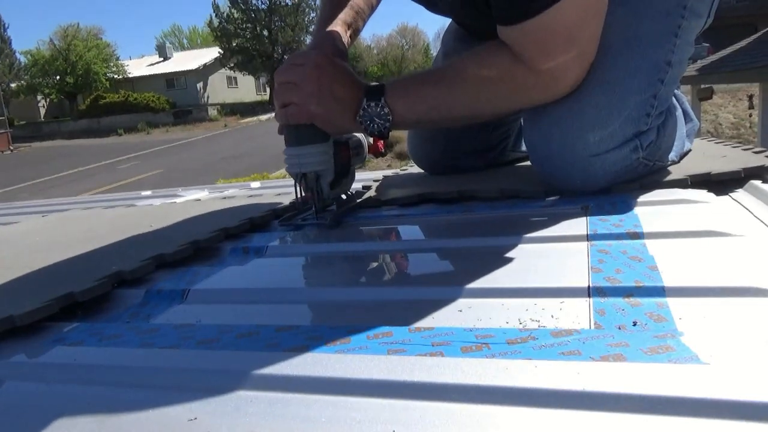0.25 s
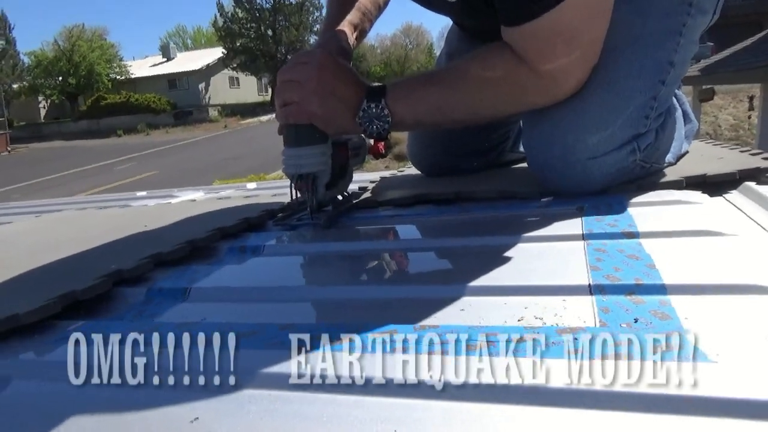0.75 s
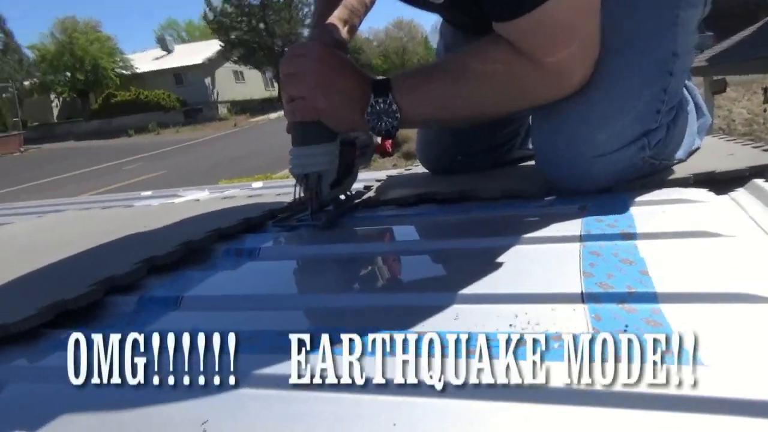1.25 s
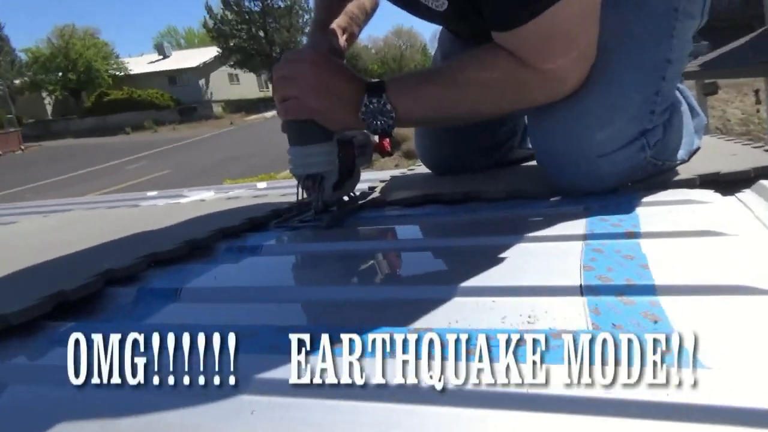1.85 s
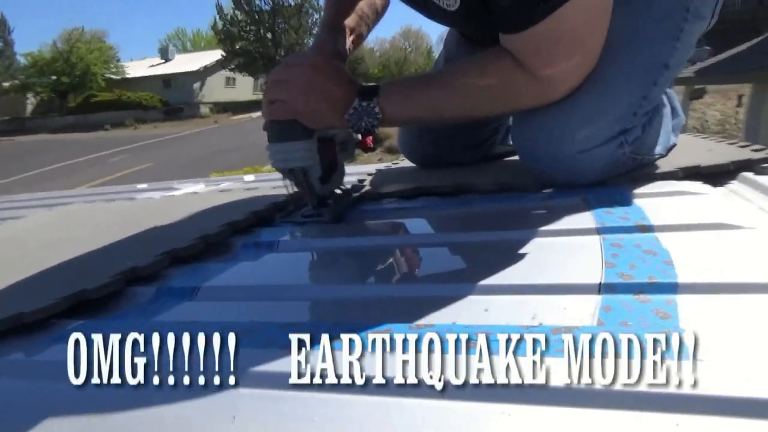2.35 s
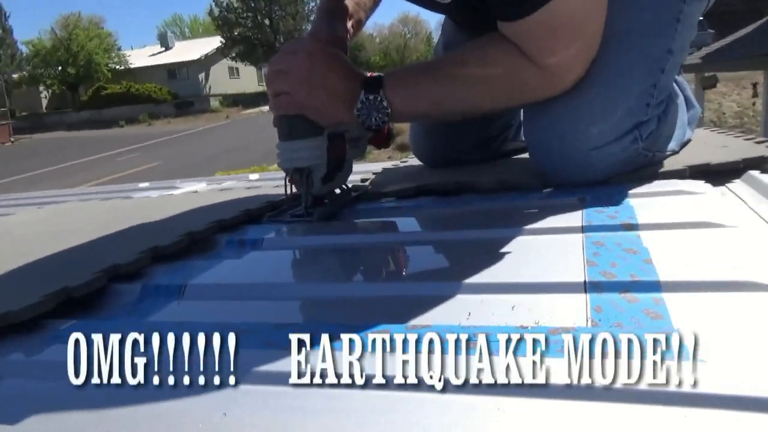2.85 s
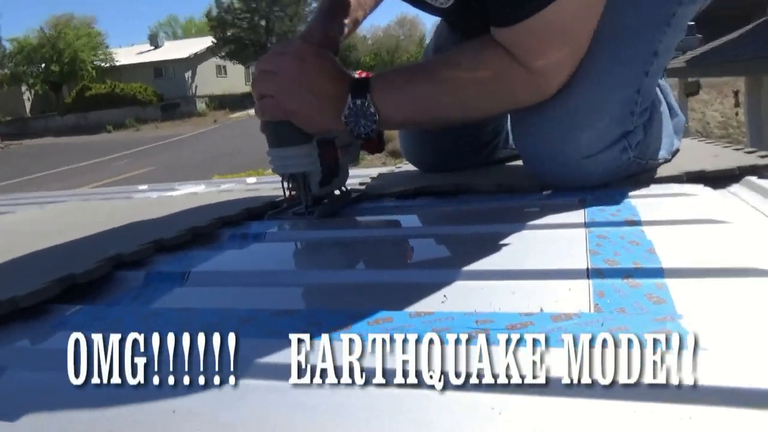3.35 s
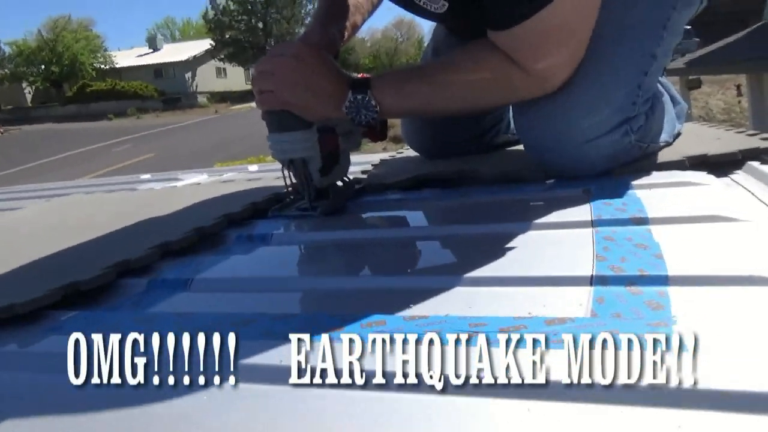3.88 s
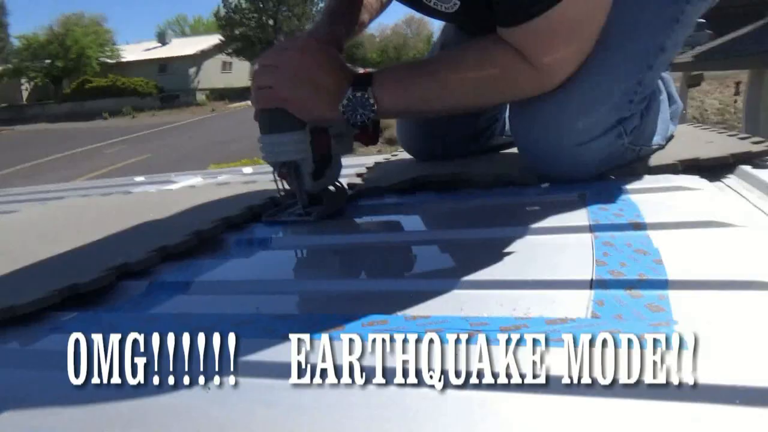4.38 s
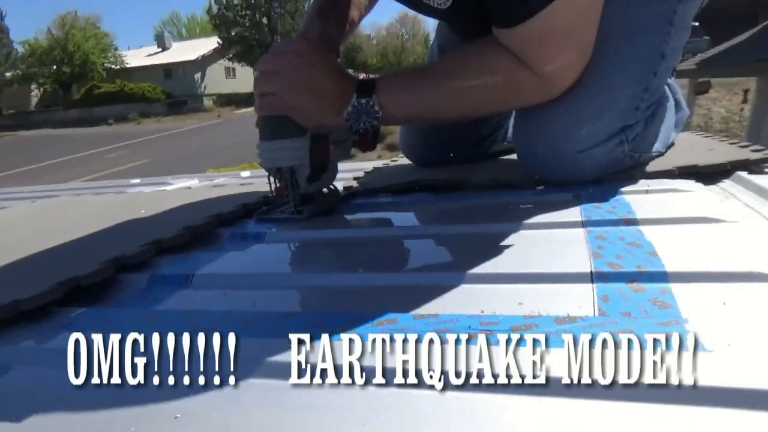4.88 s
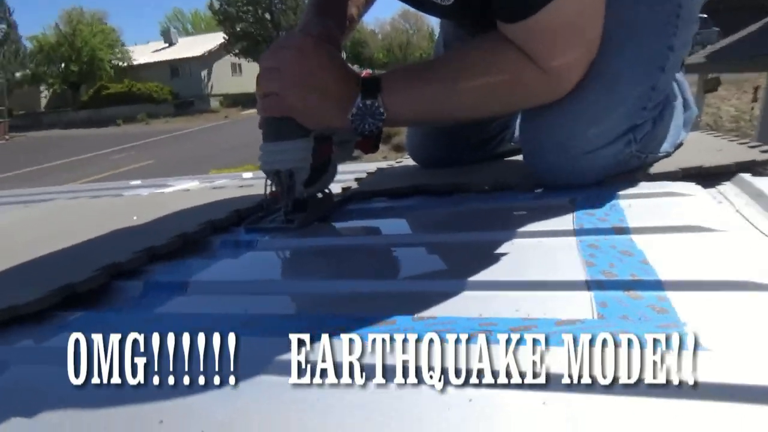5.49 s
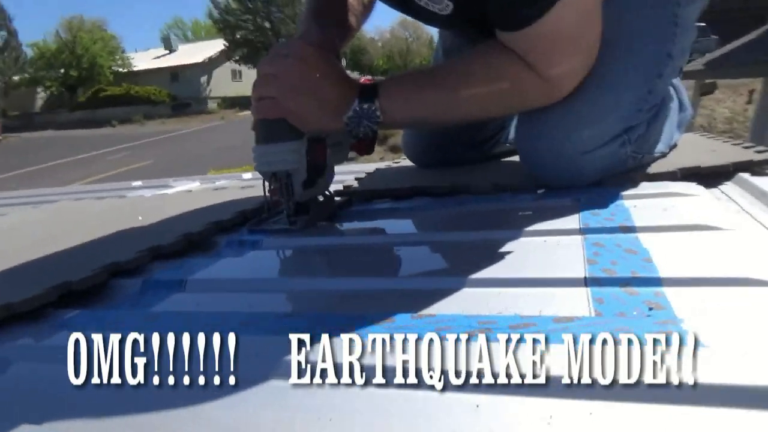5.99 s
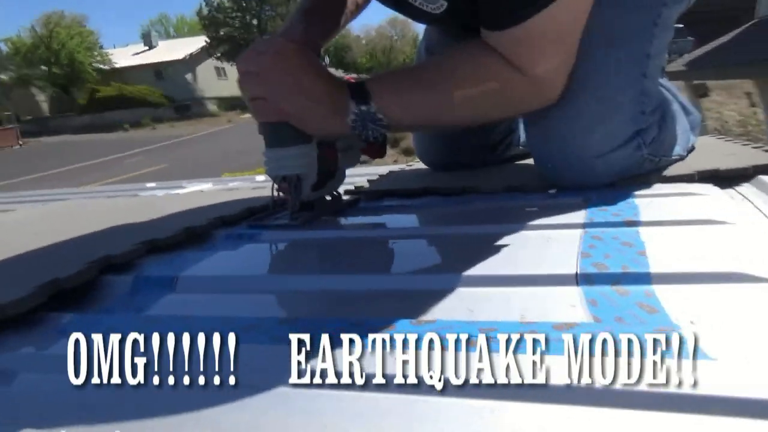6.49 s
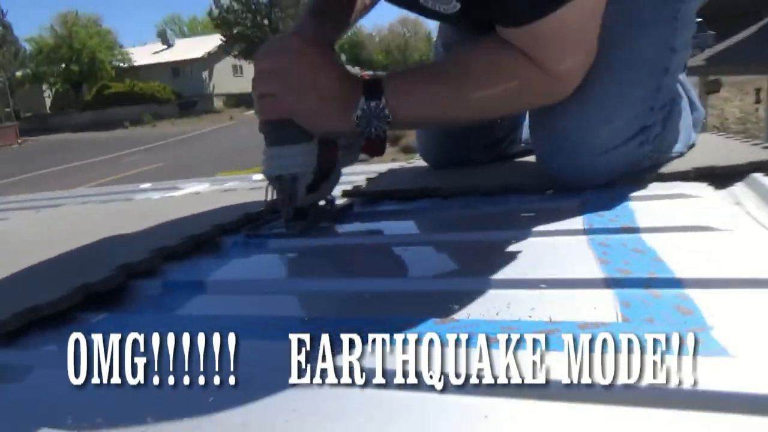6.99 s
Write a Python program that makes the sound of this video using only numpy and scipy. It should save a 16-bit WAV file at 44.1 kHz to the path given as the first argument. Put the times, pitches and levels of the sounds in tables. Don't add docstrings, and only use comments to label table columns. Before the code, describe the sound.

Switch clicks precede short bursts of jigsaw clatter on ringing sheet metal, about thirty-nine strokes per second once at speed. A longer cut grows regular and tonal, then is released and falls silent for a moment. The saw restarts and continues to the end, chattering loosely at a snag and turning boomier later. Outdoors, heard about a metre away through the roof, with faint distant traffic.

```python
import sys
import numpy as np
from scipy import signal
from scipy.fft import rfft, irfft
from scipy.io import wavfile
from scipy.ndimage import uniform_filter1d, map_coordinates

SR = 44100
rng = np.random.default_rng(int(sys.argv[2]) if len(sys.argv) > 2 else 0)


def pcm_store(signal):
    levels = np.round(np.clip(np.atleast_2d(signal), -1, 1) * 32767)
    wavfile.write(sys.argv[1], SR, levels.astype(np.int16).T)


def voltage_ratio(decibels):
    exponent = np.asarray(decibels, float) / 20
    return 10 ** exponent


N = 319010
TIME = np.arange(N) / SR
STEPS_PER_STROKE = 1152
RESTART_S = 3.19
BAND_EDGES_HZ = (600, 2000, 5500)


def unit(x):
    return x / np.sqrt(np.mean(x ** 2))


def read(points, hz):
    point_hz, point_db = np.array(points)[:, 0], np.array(points)[:, 1]
    return np.interp(np.log(np.maximum(hz, 1)), np.log(np.maximum(point_hz, 1)), point_db)


def tint(x, points):
    count = x.shape[-1]
    return irfft(rfft(x) * voltage_ratio(read(points, np.fft.rfftfreq(count, 1 / SR))), count)


def ring(x, hz, width_hz):
    return signal.lfilter(*signal.iirpeak(hz, hz / width_hz, SR), x) * np.sqrt(SR / (np.pi * width_hz))


def walk(rate_hz):
    hold = int(SR / rate_hz)
    return 0.97 * uniform_filter1d(np.repeat(rng.standard_normal(N // hold + 1), hold), hold)[:N]


def tail(t60_s, count):
    t = np.arange(int(SR * 1.2)) / SR
    h = rng.standard_normal((count, len(t))) * np.exp(-np.log(1000) * t / t60_s)
    return h / np.sqrt(np.sum(h ** 2, axis=-1, keepdims=True))


def quiet_street():
    # frequency in Hz, level in dB per Hz.
    street_colour = [(21, -73), (35, -25), (361, -18), (431, -22), (569, -18), (995, -16), (1160, -19.5),
                     (1650, -19.5), (15000, -51.5)]
    # time in seconds, level in dB.
    street_db = [(0, -40), (.3, -41.5), (.7, -44), (3.0, -55.5), (7.23, -55)]
    noise = rng.standard_normal((3, N))
    level = voltage_ratio(np.interp(TIME, *np.transpose(street_db)))
    return level * unit(tint(noise[0] + 0.39 * noise[1:], street_colour))


def trigger():
    # time in seconds, peak level in dB.
    clicks = [
        (0.0202, -11.5),
        (0.3432, -14),
        (0.618, -18.5),
        (3.171, -33),
    ]
    # frequency in Hz, width in Hz, level in dB.
    switch_modes = [(3600, 1000, -3), (4500, 270, -3), (8300, 1500, -7), (9400, 830, 0), (6700, 800, -9)]
    kicks = np.zeros(N)
    for s, db in clicks:
        i = int(s * SR)
        kicks[i:i + 90] = voltage_ratio(db - 11.0) * rng.standard_normal(90) * np.hanning(90)
    return sum(voltage_ratio(db) * ring(kicks, hz, width) for hz, width, db in switch_modes)


def motor():
    # time in seconds, strokes per second.
    speed = [(0, 30), (.65, 30), (.8, 35), (1.08, 38.75), (1.35, 38.7), (1.5, 39.3), (1.75, 38.7),
             (2.05, 38.65), (2.4, 39.25), (2.75, 38.95), (3.6, 38.5), (3.85, 39.05), (4.9, 38.9),
             (5.45, 39.15), (6.3, 39.35), (6.6, 38.7), (7.23, 38.6)]
    # middle in seconds, length in seconds, strokes per second lost.
    snags = [
        (4.38, .5, 3.8),
        (4.7, .12, .6),
        (5.15, .3, .65),
        (5.65, .3, .55),
        (6.0, .2, .6),
        (7.07, .55, 3.0),
    ]
    let_go_s, full_rate, coast_per_s, crawl_rate, spin_up_per_s = 2.745, 39, 90, 17, 150
    lost_rate = 0
    for s, length, lost in snags:
        lost_rate = lost_rate + lost * np.cos(np.pi * np.clip((TIME - s) / length, -.5, .5)) ** 2
    coast = np.maximum(full_rate - coast_per_s * (TIME - let_go_s), crawl_rate)
    limit = np.maximum(coast, crawl_rate + spin_up_per_s * (TIME - RESTART_S))
    slack = np.clip((full_rate - limit) / (full_rate - crawl_rate), 0, 1)
    return np.minimum(np.interp(TIME, *np.transpose(speed)) - lost_rate, limit), lost_rate, slack


def pulls(shares):
    # motor starts, teeth meet the sheet, sound begins to fall, silent, all in seconds.
    trigger_pulls = [
        (.035, .047, .157, .215),
        (.36, .373, .503, .527),
        (.634, .651, 2.95, 2.985),
        (3.192, 3.228, 7.5, 7.6),
    ]
    # time in seconds, push along the cut in dB, looseness of the shoe in dB.
    feed = [(.1, 0.5, 1), (.7, 0, -1.5), (1.05, 1, 0), (1.3, 0.5, 5), (1.5, 0.5, 4), (2.05, 0.04, -4.5),
            (2.6, 0.4, -0.5), (2.85, -1.5, 4), (3.55, -1, 1.5), (4.1, -1, 0), (4.3, 1.5, 12.5),
            (4.5, -2, 9.5), (4.75, 0, 10), (5.15, -0.5, 6), (5.41, -2, 1), (6.15, 0, 2), (6.7, 2.5, -2.5),
            (7.23, 3.5, 1.5)]
    place_db = [
        (-32.5, -20, -19.5, -19.5),
        (-44.5, -18, -22, -22.5),
        (-30, -18, -23.5, -21.5),
    ]
    push_share = (0.96, 0.82, 1.3, 1.45)
    loose_share = (1, 0.12, 0.24, -0.078)
    # level in dB while the blade runs free, level in dB reached as the sound falls to silence.
    free_db = (-2, -15.5, -7.5, -2)
    end_fall_db = (-6, -5.5, -21.5, -26)
    start_db, rise_s, meet_s = -31, 0.0057, 0.0023
    s, push, loose = np.transpose(feed)
    db = np.transpose(place_db) @ np.array(shares)
    db = db + np.outer(push_share, np.interp(TIME, s, push))
    db = db + np.outer(loose_share, np.interp(TIME, s, loose))
    gate = np.zeros((4, N))
    for start, meet, fall_start, silent in trigger_pulls:
        on = (TIME >= start) & (TIME < silent)
        times = np.maximum.accumulate([start, start + rise_s, meet, meet + meet_s, fall_start, silent])
        for band, (free, fall) in enumerate(zip(free_db, end_fall_db)):
            gate[band, on] = voltage_ratio(np.interp(TIME[on], times, [start_db, free, free, 0, 0, fall]))
    return uniform_filter1d(gate * voltage_ratio(db), 88, axis=1)


def strokes(turns, likeness, grain_db=1.0):
    shape = (300, STEPS_PER_STROKE)
    rows = rng.standard_normal(shape) * voltage_ratio(grain_db * np.minimum(rng.exponential(size=shape), 3))
    keep = np.clip(np.interp(np.arange(300), turns, likeness), 0, .99)
    for k in range(1, 300):
        rows[k] = keep[k] * rows[k - 1] + np.sqrt(1 - keep[k] ** 2) * rows[k]
    return unit(rows.ravel())


def bite(turns, depth, force, fall=0.21, back_db=-7.5, back_turn=0.41):
    pulse = 0
    for k, (late, db) in enumerate([(0, 0), (back_turn, back_db)]):
        p = turns + 4 - late
        pulse = pulse + voltage_ratio(db) * force[p.astype(int), k] * np.exp(-(p % 1) / fall)
    pulse = uniform_filter1d(pulse, size=200)
    return unit(1 + np.clip(depth, 0, .95) * (pulse / pulse.mean() - 1))


def shake(turns, likeness, boom, running):
    # multiple of the stroke rate, level in dB.
    orders = [(1, -34), (2, -31), (3, -15), (4, -14.5), (5, -14), (6, -8), (7, -19), (8, -6.5), (9, 1.5),
              (10, -1), (11, -4), (12, -21)]
    out = 0
    for k, db in orders:
        phase = 2 * np.pi * (k * turns + rng.random()) + 0.91 * walk(4.3)
        line = voltage_ratio(db + 2 * walk(3.51)) * np.sin(phase)
        out = out + line * (voltage_ratio(-40.0) * running if k < 6 else voltage_ratio(-3.0) * boom)
    return out * np.sqrt(likeness)


def teeth(turns, caught, likeness, slack):
    # teeth passing per stroke, level in dB.
    tooth_orders = [(42, 0), (34, -3)]
    late_turns, sweep_turns, slip_hz = 0.24, .16, 23
    slow_db = (0, -11.5)
    angle, out = 2 * np.pi * (caught - late_turns), 0
    for (order, db), fade_db in zip(tooth_orders, slow_db):
        slip = np.cumsum((1 - likeness) * walk(35.0)) * slip_hz / SR
        tone = np.sin(2 * np.pi * (order * turns - sweep_turns * np.cos(angle) + slip))
        out = out + tone * voltage_ratio(db + fade_db * slack + 0.57 * walk(24.84))
    return unit(out * (1 + 0.49 * np.cos(angle)))


def singing(knocks, caught, force, running):
    # start in seconds, length in seconds, frequency in Hz, width
    # in Hz, level in dB.
    resonances = [(0.42, 0.12, 1450, 110, -21.5), (0.69, 0.14, 1445, 29, -24),
                  (0.923, 0.09, 1450, 50, -25), (2.82, 0.11, 2010, 87, -22.5),
                  (3.228, 0.012, 2050, 230, -11.5), (3.57, .62, 5090, 140, -26),
                  (1.27, 1.43, 2660, 170, -26), (0.97, 0.47, 1760, 100, -31),
                  (3.26, 0.93, 3050, 42, -30.5), (4.67, 1.1, 4230, 110, -31), (5.8, 0.65, 3620, 130, -41),
                  (6.24, 0.83, 1590, 280, -29), (4.22, 1.16, 2680, 140, -27.5), (4.1, 2.55, 1924, 79, -28),
                  (6.8, 0.67, 3700, 250, -32), (2.94, 0.19, 1100, 50, -50), (0.469, .055, 350, 79, -26.5),
                  (1.91, 0.98, 935, 76, -34), (4.055, 0.65, 928, 20, -31), (3.23, 0.56, 1370, 250, -24.5),
                  (2.94, 0.051, 806, 150, -28), (2.39, 0.6, 430, 30, -49), (3.12, 1.11, 346, 84, -43),
                  (4.0, 0.92, 620, 120, -44.5),
                  (.65, 2.1, 8300, 350, -35), (.65, 2.0, 12400, 300, -33.5), (3.3, 2.5, 6640, 250, -37),
                   (5.5, 2.2, 13500, 700, -34), (6.4, 1.4, 9000, 500, -36), (4.195, .3, 2900, 1000, -24)]
    blow = unit(np.diff(np.floor(caught), prepend=0).clip(0))
    struck = unit(blow + 0.84 * knocks)
    out = 0
    for s, length, hz, width, db in resonances:
        swell = np.sqrt(np.sin(np.pi * np.clip((TIME - s) / length, 0, 1)).clip(0))
        pulse = bite(caught + 0.024, 0.36 * running, force, fall=0.24, back_db=-15.0)
        source = struck if hz < BAND_EDGES_HZ[-1] else knocks
        out = out + voltage_ratio(db) * ring(source * swell * pulse, hz, width)
    return out


def panel(knocks, rasp, gains, modes, colour, over_db, rasp_hz=4500):
    broad = [(hz, hz / 4, read(colour, hz)) for hz in 39 * 2 ** (np.arange(27) / 3)]
    narrow = [(hz, max(w, hz / 45), db + over_db) for hz, w, db in modes]
    parts = np.array(broad + narrow)
    band = np.searchsorted(BAND_EDGES_HZ, parts[:, 0])
    power = voltage_ratio(parts[:, 2]) ** 2 * parts[:, 1]
    out = 0
    for k, ((hz, width, _), b, p) in enumerate(zip(parts, band, power)):
        is_broad = k < len(broad)
        fresh = 1 / (1 + (rasp_hz / hz) ** 2)
        push = np.sqrt(1 - fresh) * knocks + np.sqrt(fresh) * rasp
        if not is_broad:
            push = np.roll(push, 37 * k)
        wander_db = .8 if is_broad else 1.8
        level = np.sqrt(p / power[band == b].sum()) * voltage_ratio(wander_db * walk(6.5))
        y = ring(push * gains[b] * level, hz, width)
        if is_broad:
            y = (-1) ** k * 1.1 * signal.lfilter(*signal.iirpeak(hz, hz / width, SR), y)
        out = out + y
    return out


def jigsaw():
    # time in seconds, stroke likeness 0-1, tooth tone over mid clatter in dB, bite depth 0-1.
    grip = [(0, .3, -22, .25), (.9, .3, -20, .2), (1.15, .75, -15, .12), (1.45, .6, -11, .19),
            (1.7, .92, -1, .17), (2.45, .95, 1, .32), (2.7, .93, 0, .3), (2.9, .65, 1, .5),
            (3.25, .65, 1, .33), (3.8, .93, 2, .38), (4.1, .9, 1, .3), (4.7, .76, -2, .3),
            (4.95, .9, -4, .28), (5.25, .82, -7, .24), (5.6, .8, -14, .3), (6.1, .88, -18, .42),
            (6.6, .8, -18, .27), (7.23, .55, -18, .36)]
    # time in seconds, phase in turns.
    catch = [(0, 0.54), (1.1, 0.56), (2.0, 0.19), (2.9, 0.4), (3.4, 0.36), (4.35, 0.3), (4.9, .43),
             (6.2, 0.41), (6.7, 0.3), (7.23, 0.34)]
    moves_s = (1.045, 0.12, 5.585, 1.07)
    # frequency in Hz, width in Hz, level in dB.
    modes_start = [(895, 36, -12), (1160, 20, -8), (1454, 21.6, -11), (2540, 1450, 3), (3600, 56, -15),
                   (4280, 380, -2.5), (4650, 220, -5)]
    modes_middle = [(976, 11, 8), (1297, 244, 7), (1800, 33, -30), (2815, 46, -2), (3425, 14, -5),
                    (3660, 13, -28), (3770, 33, -32), (5440, 270, -17.5), (6600, 58, -13.5),
                    (7080, 89, -12), (8590, 1540, -5.5)]
    modes_end = [(328.4, 14.6, 6.5), (664, 35, -7.5), (1141, 29, -0.5), (1440, 280, -4), (1974, 170, -2),
                 (2870, 45, -17), (3680, 21, -14.5), (4320, 140, -15), (5200, 41, -28), (9440, 350, -6.5)]
    # frequency in Hz, level in dB per Hz.
    colour_start = [(21, -65), (35, -15), (280, -12.5), (334, 4), (389, -5.5), (899, -13.5), (1020, -14),
                    (1460, -1.5), (1650, -22.5), (2810, -14), (5580, -14), (12600, -15), (15000, -21.5)]
    colour_middle = [(21, -76), (35, -37), (280, -8), (343, 11.5), (734, -10), (922, -14), (1020, -7),
                     (1610, 6.5), (2130, 0.5), (2670, -10), (3910, -12.5), (8370, -13), (15000, -21)]
    colour_end = [(21, -68), (35, -34), (253, -0.5), (310, -1), (502, -3), (1160, -7.5), (1250, -19),
                  (1920, -19), (2300, -3), (3110, 0), (5870, -9.5), (9030, -2), (15000, -14.5)]
    # lift of the resonances over the colour, in dB.
    modes_over_db = (3, 2, 6)
    band_lag_turns = (0.415, 0.33, 0.072, .01)
    gap_share = (.3, .35, 1.1, 1.2)
    deepen, least_depth = (0.84, 0.34, 0.84, 1.29), (0.35, 0.52, 0.14, 0.12)
    coast_gap_db, spin_gap_db, chatter_db = -10.5, 1, 3.5

    rate, snag, slack = motor()
    turns = np.cumsum(rate) / SR
    caught = turns - np.interp(TIME, *np.transpose(catch)) + 0.16
    grip_s, *grip_columns = np.transpose(grip)
    likeness, whine_db, depth = (np.interp(TIME, grip_s, column) for column in grip_columns)
    likeness = likeness - .06 * snag
    depth = np.maximum(depth, 0.24 * (1 - likeness))
    wobble = walk(30.0)
    caught = caught + .12 * (1 - likeness) ** 2 * wobble
    knocks = unit(map_coordinates(strokes(turns, likeness), [turns * STEPS_PER_STROKE], order=3))
    rasp = unit(rng.standard_normal(N) * voltage_ratio(2.0 * np.minimum(rng.exponential(size=N), 4)))
    force = voltage_ratio(1.94 * rng.standard_normal((320, 2)))

    first, second = (np.clip((TIME - t) / length + .5, 0, 1) for t, length in (moves_s[:2], moves_s[2:]))
    shares = (1 - first, first - second, second)
    gains = pulls(shares)
    gap_db = np.where(TIME < RESTART_S, coast_gap_db, spin_gap_db)
    gap_db = gap_db * slack * np.sin(np.pi * (caught - 0.3)) ** 2
    gains = gains * voltage_ratio(np.outer(gap_share, gap_db))
    gains *= voltage_ratio(chatter_db * (1 - likeness) * wobble)
    gains[1] *= voltage_ratio(0.33 * whine_db)
    lows = shake(turns, likeness, gains[0], np.clip(gains[2] / voltage_ratio(-44.0), 0, 1))
    tooth_tone = gains[1] * teeth(turns, caught, likeness, slack)
    together = 1 - 0.78 * second
    gains *= [bite(caught - lag * together, deep * depth + least, force)
              for lag, deep, least in zip(band_lag_turns, deepen, least_depth)]
    tone_share = 1 / (1 + voltage_ratio(-whine_db) ** 2)
    songs = singing(knocks, caught, force, np.clip(gains[2] / voltage_ratio(-35.0), 0, 1))
    common = tooth_tone * np.sqrt(tone_share) + lows + songs
    gains[1] *= np.sqrt(1 - tone_share)
    gains[0] *= voltage_ratio(-2.5)
    places = zip(shares, (modes_start, modes_middle, modes_end),
                 (colour_start, colour_middle, colour_end), modes_over_db)
    return [panel(knocks, rasp, gains * np.sqrt(w), m, c, db) + common * w for w, m, c, db in places]


def van_ringing(mid):
    # t60 in seconds, level in dB, then rows of frequency in Hz, level in dB.
    panel_tail = (0.3, -2.5, [(60, -46), (300, -2), (850, 0), (1700, -12), (4000, -17.5), (14000, -21)])
    # frequency in Hz, level in dB per Hz.
    hollow_colour = [(35, -45), (60, -15), (247, -52), (356, 20), (427, -25), (866, -29), (1310, -17),
                     (1720, -15), (6450, -36), (14000, -27)]
    hollow_t60_s, hollow_db, port_share = 1.1, -37, .35
    t60_s, panel_db, panel_colour = panel_tail
    rings = voltage_ratio(panel_db) * tint(tail(t60_s, count=2), panel_colour)
    rings = rings + voltage_ratio(hollow_db) * tint(tail(hollow_t60_s, count=2), hollow_colour)
    shared = rings.mean(axis=0)
    rings = shared + port_share * (rings - shared)
    return signal.fftconvolve(mid[None], rings, axes=1)[:, :N]


def port_difference(places):
    # frequency in Hz, level under the middle in dB.
    side_colour = [(60, -33), (110, -36), (200, -34), (380, -14), (700, -5), (1290, -8.5), (2380, -12),
                   (4400, -11.5), (8120, -17.5), (15000, -44)]
    paths = zip(places, tail(0.049, count=3))
    return tint(sum(signal.fftconvolve(x, h)[:N] for x, h in paths), side_colour)


def scene():
    # time in seconds, left minus right in dB.
    pan = [(0, 0), (1.5, 0.5), (2.8, -0.3), (3.6, -0.9), (4.5, -1.5), (5.2, -0.8), (6, 0.2), (7.23, -0.5)]
    places = jigsaw()
    mid = sum(places) + trigger()
    sides = np.array([[1], [-1]])
    direct = mid * voltage_ratio(sides * np.interp(TIME, *np.transpose(pan)) / 2)
    return direct + port_difference(places) * sides + van_ringing(mid) + quiet_street()


def band_limit(x):
    return signal.sosfilt(signal.butter(12, 15800, fs=SR, output="sos"), x)


def record(dry):
    thin = signal.sosfilt(signal.butter(2, 90, "highpass", fs=SR, output="sos"), dry)
    return band_limit(0.72 * np.tanh(thin / 0.79))


dry = scene()
out = record(dry)
pcm_store(out)
```